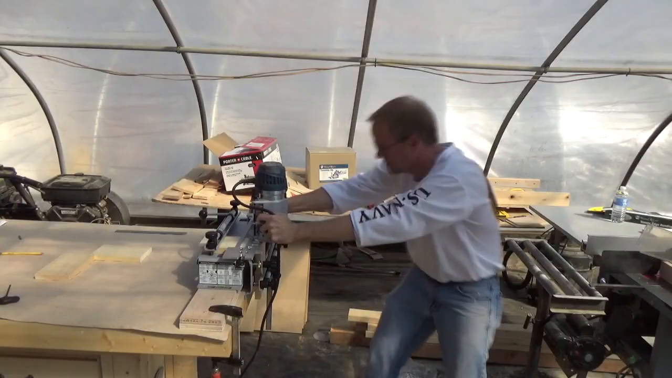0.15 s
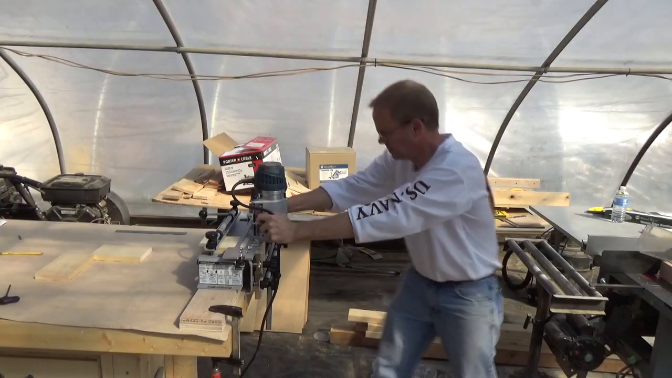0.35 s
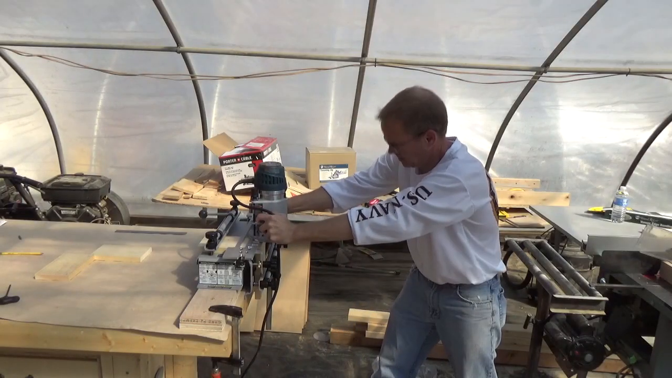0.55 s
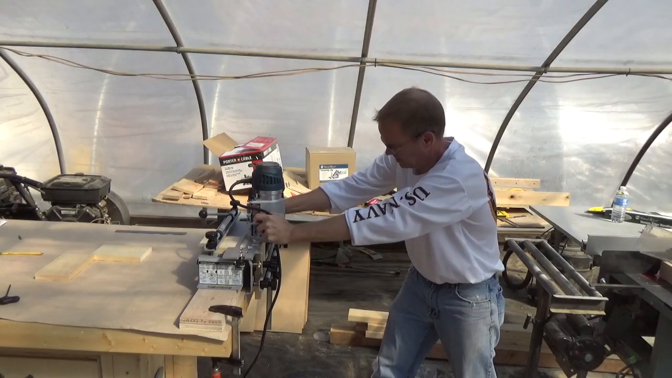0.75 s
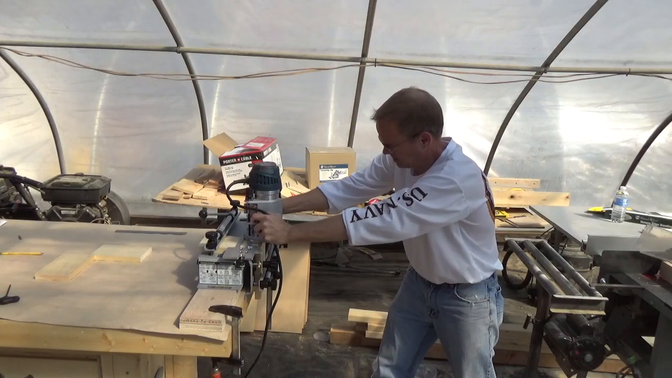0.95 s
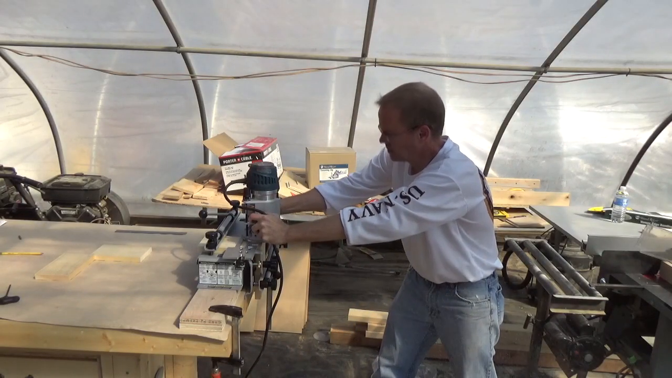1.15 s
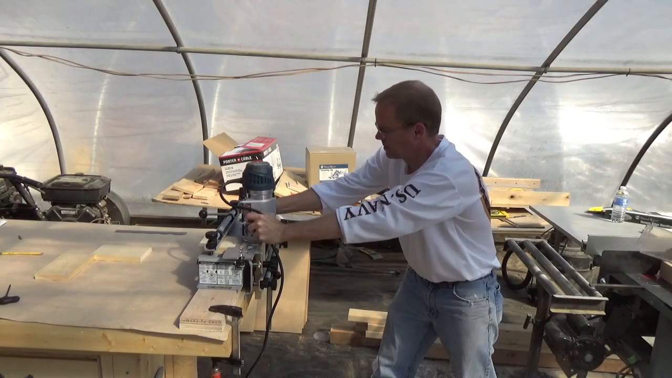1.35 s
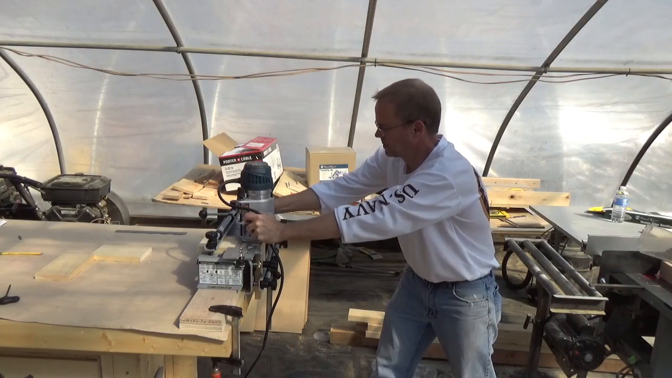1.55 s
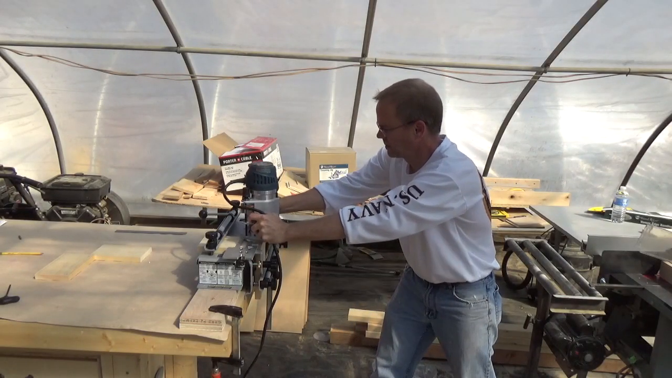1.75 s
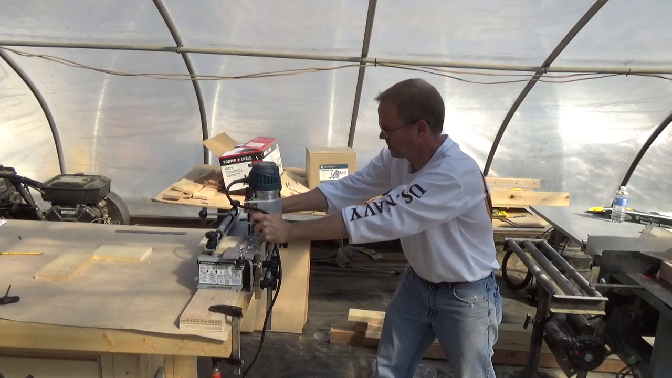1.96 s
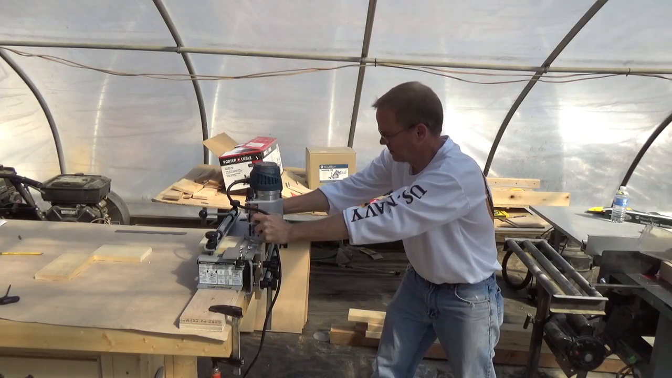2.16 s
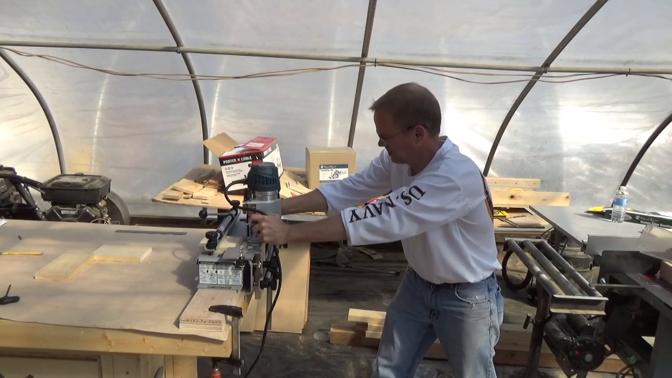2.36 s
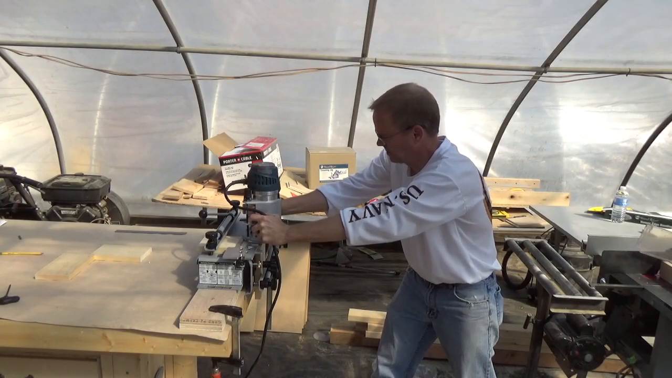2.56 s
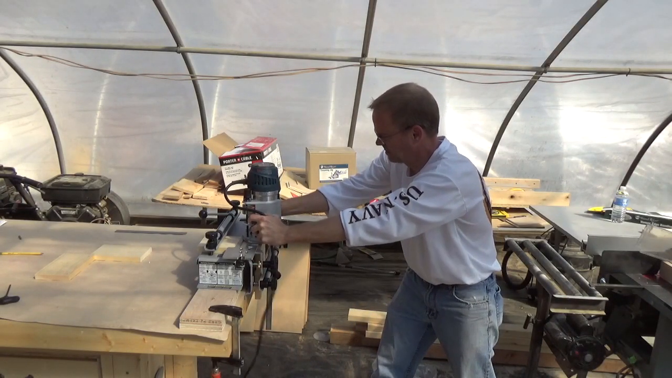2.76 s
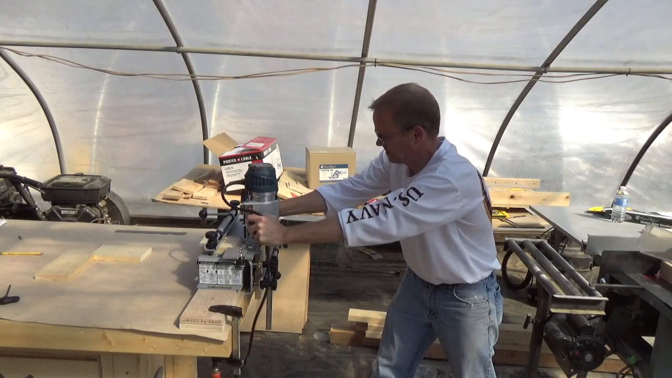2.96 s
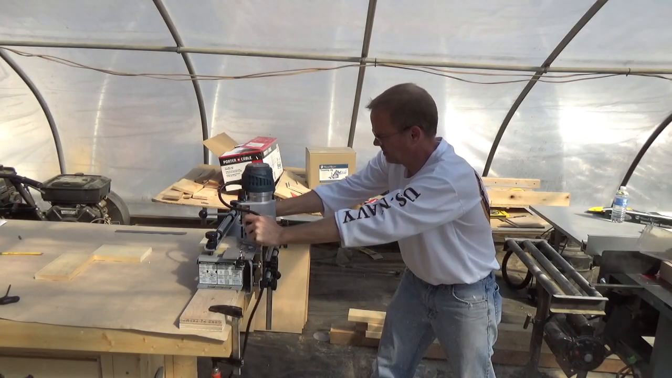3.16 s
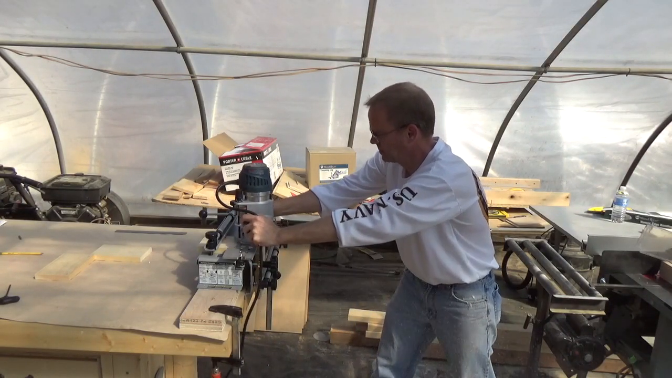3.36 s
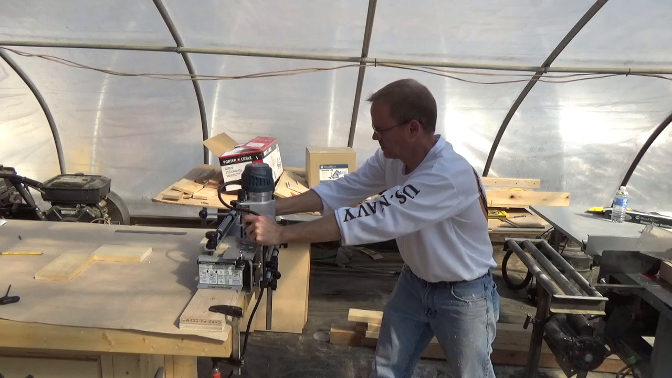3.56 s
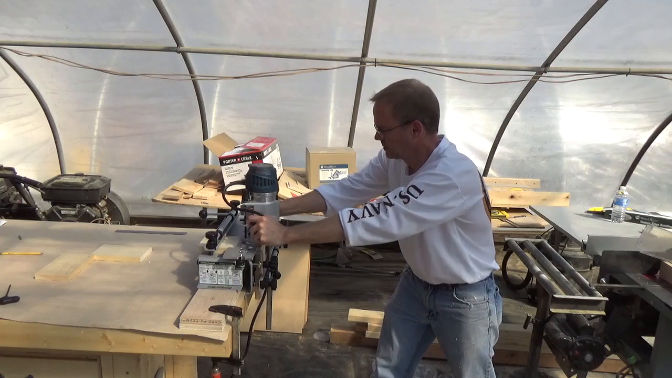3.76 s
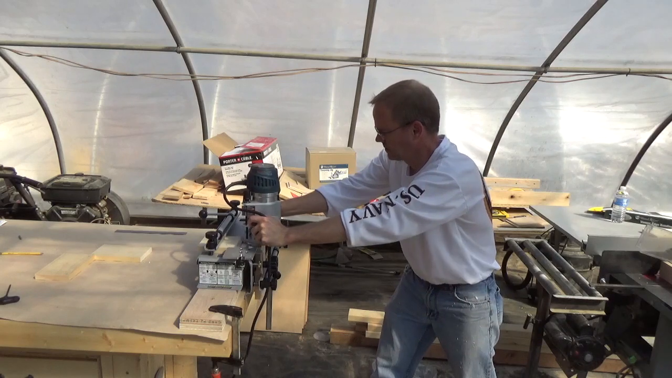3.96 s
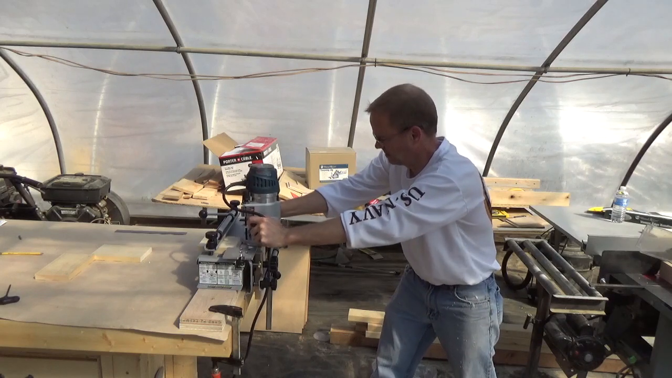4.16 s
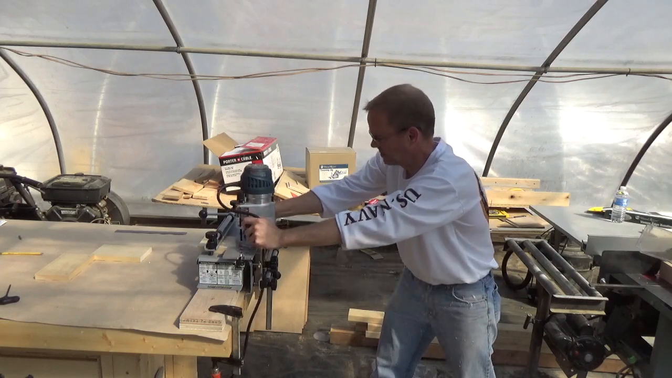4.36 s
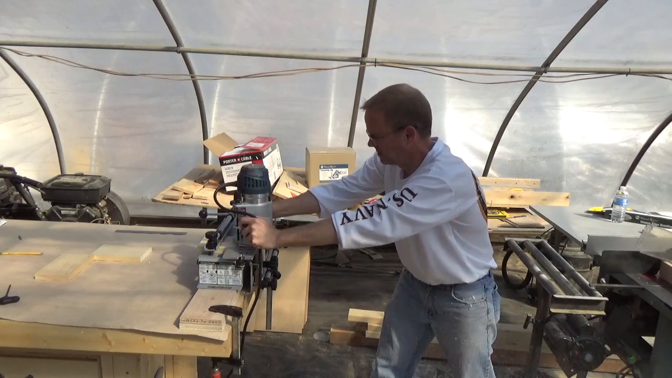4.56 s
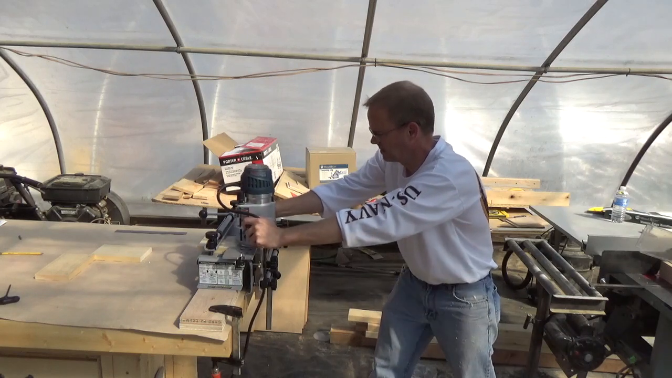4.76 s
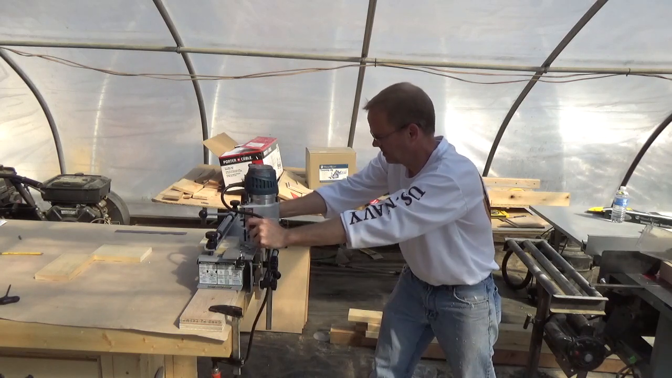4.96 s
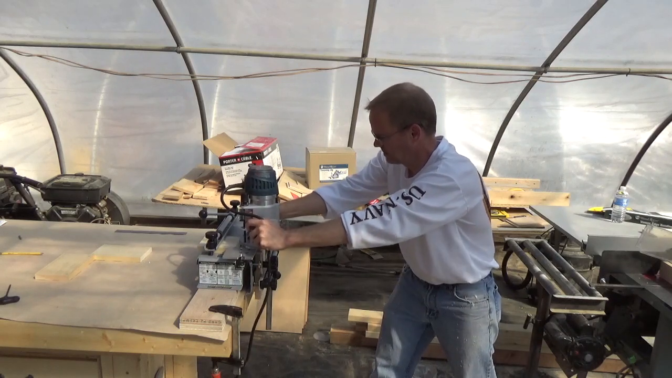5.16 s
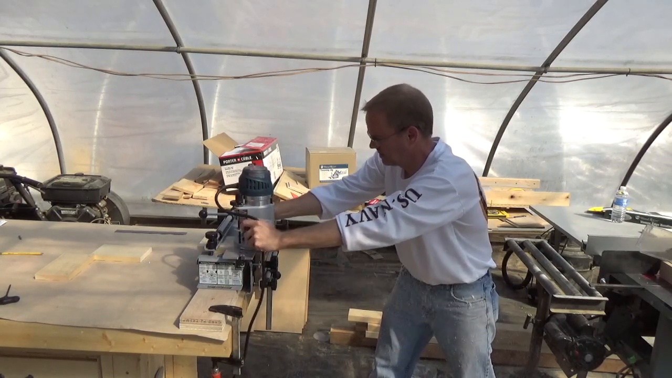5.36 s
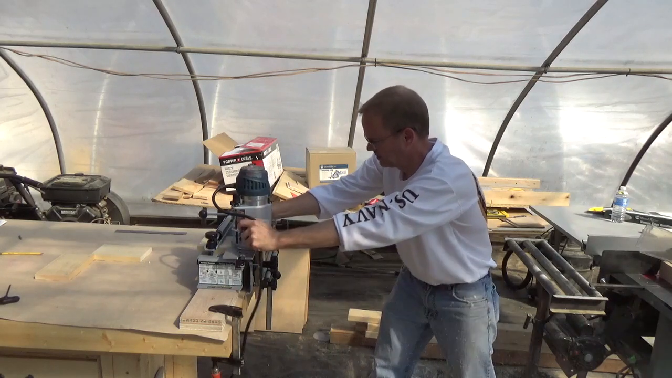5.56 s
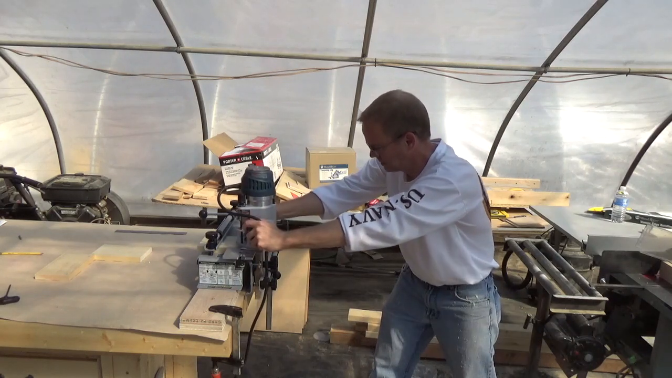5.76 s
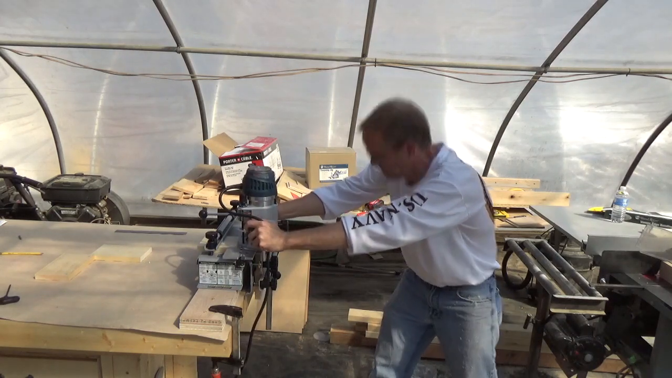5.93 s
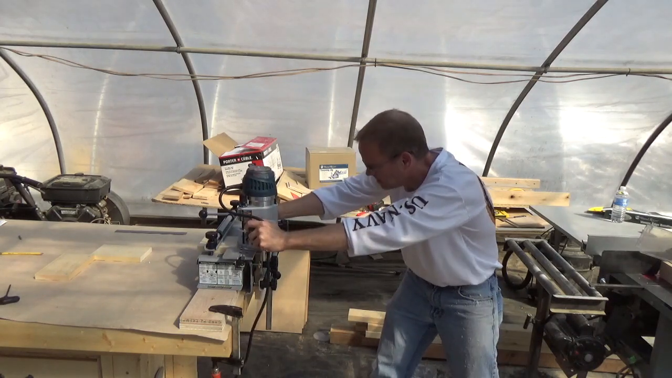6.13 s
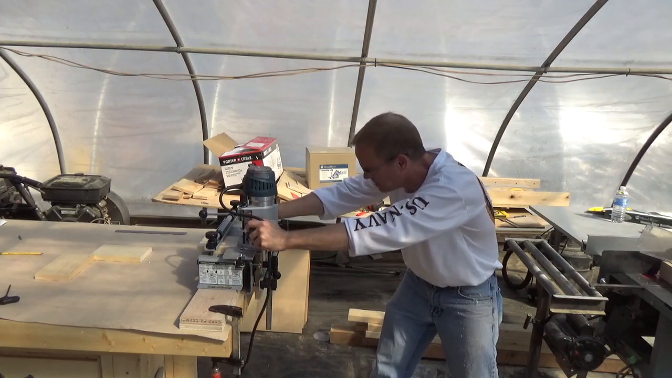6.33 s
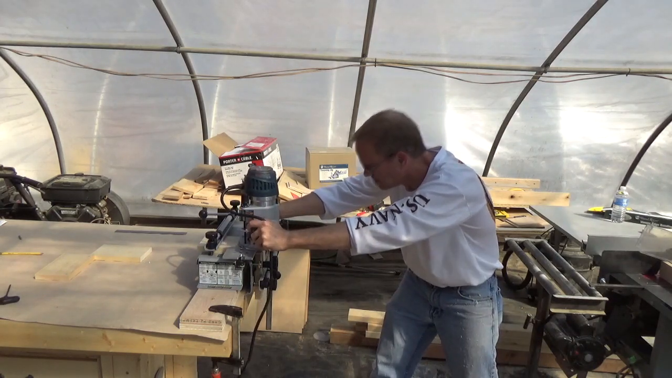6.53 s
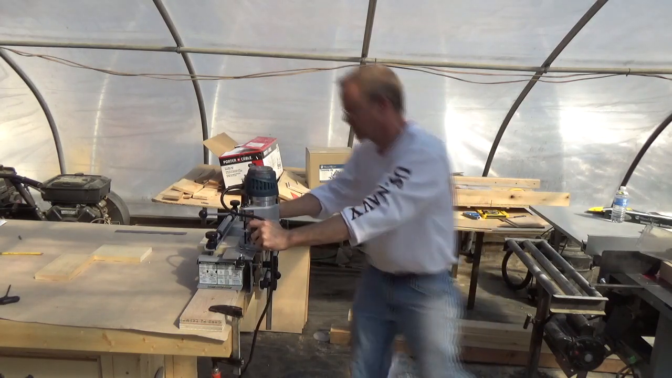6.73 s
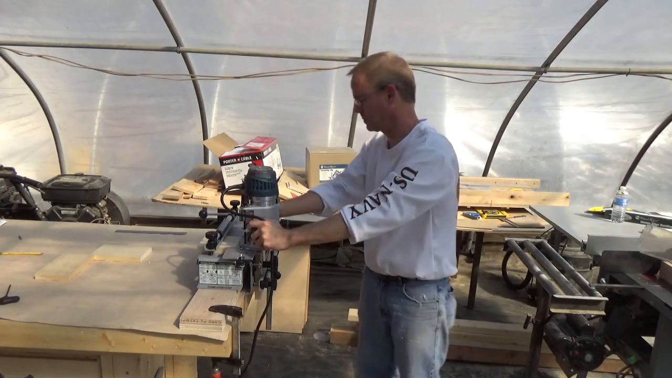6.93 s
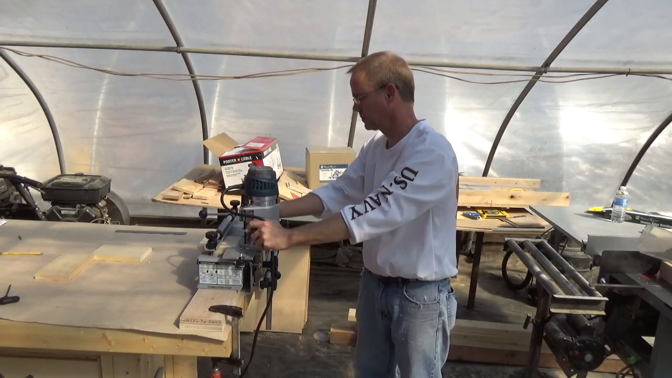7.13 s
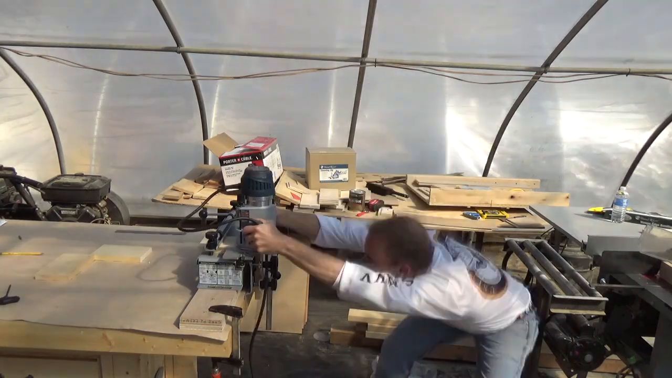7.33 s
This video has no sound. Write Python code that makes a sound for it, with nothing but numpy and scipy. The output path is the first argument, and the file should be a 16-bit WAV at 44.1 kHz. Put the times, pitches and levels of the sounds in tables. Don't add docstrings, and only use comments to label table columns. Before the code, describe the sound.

In a plastic-skinned workshop tunnel, cloth scuffs softly near the microphone before a handheld router surges up to a steady, piercing whine with rushing air. It makes one short cut, a pause, then three more cuts, each dragging the pitch down before it springs back. The power goes off and the motor coasts down, its hum swelling through resonances. A tiny mute interrupts the very end.

```python
import sys
import numpy as np
from scipy import signal
from scipy.io import wavfile
from scipy.ndimage import uniform_filter1d

SR = 44100
rng = np.random.default_rng(int(sys.argv[2]) if len(sys.argv) > 2 else 0)


def gain_from_db(level_db):
    decades = np.asarray(level_db, float) / 20
    return 10 ** decades


def put_to_file(sound):
    columns = np.atleast_2d(sound).T
    safe = np.clip(columns, -1, 1)
    whole_steps = np.round(safe * 32767)
    wavfile.write(sys.argv[1], SR, whole_steps.astype(np.int16))


N = 330309
COARSE = 40

# bit enters t/s, breaks out t/s, sag of the turn rate f/Hz, recovery t/s, whine lift level/dB
CUTS = [
    (0.936, 1.311, 17.2, .24, 2),
    (2.808, 3.371, 33.4, 0.39, 3.5),
    (4.173, 4.551, 37.5, .336, 3),
    (5.168, 5.538, 32.8, 0.32, 2),
]
# multiple, free level/dB, biting level/dB, flicker level/dB
LOW_TONES = [(1, -39.5, -46.5, -0.03), (2, -47.5, -46, .8), (3, -50.5, -40.5, 1), (4, -49.5, -42.5, 1.1),
             (5, -37.5, -34.5, .08), (6, -51, -36.5, 1.1), (7, -51, -49.5, 3.5)]
# t/s, half width t/s, multiple, level/dB
SHIFTS = [(0.9, 0.039, 1, 3.5), (6, 0.19, 1, 1), (1.2, 0.2, 2, -8.5), (3.58, 0.038, 2, -17),
          (3.92, 0.15, 2, 8.5), (4.9, 0.072, 2, 9), (2.15, 0.17, 3, 6.5), (3.0, 0.05, 3, 10.5),
          (3.72, 0.036, 3, 12), (4.29, .05, 3, 15), (4.89, 0.025, 3, 3), (5.28, 0.082, 3, 17),
          (2.06, 0.47, 4, 7.5), (3.83, 0.047, 4, 13.5), (5, 0.35, 4, -5.5), (1.304, 0.045, 5, -13),
          (1.31, .06, 7, -13), (4, .05, 4, -7), (4.5, 0.051, 6, 3), (1.6, .28, 5, -2), (2.44, 0.31, 5, 3),
          (5.19, 0.042, 5, -6.5), (3.19, 0.057, 6, 7.5), (1.72, 0.13, 6, 6.5), (1.17, 0.07, 7, 8),
          (2.32, 0.025, 7, 12), (3.19, 0.034, 7, 12.5), (4.03, 0.064, 7, 12.5), (5.98, .14, 7, 8)]
# f/Hz, width f/Hz, level/dB
STANDING_WAVES = [(115, 4.6, -62), (141, 8.3, -60), (163, 6, -63), (193.6, 7.1, -44.5), (230, 9.5, -54),
                  (265.4, 8.4, -46.5), (292, 12, -46), (317.5, 7.4, -58), (358.7, 10.6, -42),
                  (403, 24, -45.5), (440, 9.1, -33.5), (486, 24, -35.5), (636, 110, -37), (743, 35, -37)]
# t/s, half width t/s, dip of the router
# level/dB
NULLS = [
    (1.34, .014, -4),
    (1.818, .009, -2),
    (4.585, .018, -1),
    (5.57, .022, -1),
]
# multiple, level/dB
FREE_WHINE = [(8, -15), (9, -11), (10, -12), (11, -13), (12, -15), (13, -9), (14, -14), (15, -17),
              (16, -20), (17, -19), (18, -10), (19, -16), (20, -19), (21, -20), (22, -19), (23, -23),
              (24, -20), (25, -25), (26, -32)]
# multiple, level/dB
BITING_WHINE = [(8, -9), (9, -8), (10, -14), (11, -17), (12, -14), (13, -22), (14, -20), (15, -18),
                (16, -18), (17, -22), (18, -16), (19, -18), (20, -21), (21, -19), (22, -23), (23, -24),
                (24, -27), (25, -27), (26, -28)]
# t/s, half width t/s, multiple, level/dB
FLARES = [(0.94, 0.1, 10, 9.5), (.97, .06, 14, 8), (1.32, 0.038, 13, 2), (1.305, .06, 14, 14),
          (1.5, 0.19, 18, 4), (3.24, .09, 8, 7), (3.3, .08, 9, 4), (3.58, .07, 16, 7), (3.0, .08, 16, 7),
          (4.35, .07, 15, 6), (3.55, .06, 24, 7), (3.09, 0.075, 13, -8), (4.18, 0.032, 10, 13),
          (2.34, .06, 10, 9), (1.82, 0.02, 10, 8), (3.65, 0.053, 10, 3), (1.23, 0.044, 20, 15),
          (5.12, .12, 8, 7), (5.35, 0.072, 9, -1), (6.0, .12, 8, 5), (5.85, 0.12, 15, 13)]
# t/s, level/dB
SLOT_WHINE = [
    (0.39, -63),
    (0.43, -54),
    (0.438, -29.5),
    (0.465, -33.5),
    (0.49, -42),
    (0.505, -53),
    (0.56, -77.5),
]
# t/s, level/dB
SHELL_RING = [
    (6.0, -110),
    (6.1, -70),
    (6.17, -53),
    (6.35, -48),
    (6.48, -47),
    (6.54, -62),
    (6.6, -110),
]
# f/Hz, level/dB per Hz
RUSH_COLOUR = [(300, -13), (600, -14), (1000, -1), (1500, 4), (2300, -5), (2800, -5.5), (4500, -0.5),
               (7500, -0.5), (10500, -8.5), (11500, -14)]
# f/Hz, width f/Hz, level/dB
HOUSING = [(650.5, 57, -5.5), (738, 19.8, 2.5), (921, 47, -0.5), (1213, 53, -1), (1420, 780, -10.5),
           (2270, 570, -8), (3240, 800, -15), (4700, 350, -13), (5100, 220, -17.5), (8850, 870, -19.5)]
# multiple of the turn rate, lift level/dB, log spread
RUBBING = [
    (4.04, 6, 0.27),
    (22.2, 6.5, 0.24),
    (46, 5, 0.26),
]
# t/s, half width t/s, level/dB
SCUFFS = [
    (.092, 0.031, -58),
    (.163, .014, -70),
    (.262, 0.022, -64.5),
    (.36, 0.05, -55),
]
# f/Hz, level/dB per Hz
SCUFF_COLOUR = [(180, -36), (300, -11), (431, -7), (888, -2.5), (1100, -1), (1700, -1), (2100, -6.5),
                (11000, -11.5), (14300, -44), (22000, -120)]
# t/s, level/dB
RUMBLE = [
    (0, -71),
    (.4, -62),
    (.7, -75),
    (3, -74.5),
    (5.9, -75),
    (6.4, -67.5),
    (6.9, -60.5),
    (7.2, -61.5),
    (7.49, -60),
]
# f/Hz, level/dB per Hz
RUMBLE_COLOUR = [(25, -9), (60, 0), (120, -3), (250, -9), (450, -11), (700, -18)]
# f/Hz, left-right likeness 0-1
LIKENESS = [(60, 0.87), (170, 1), (480, 0.87), (1370, 0.8), (3880, 0.88), (11000, 0.98)]
# t/s, gain level/dB
MUTE = [
    (7.3975, 0),
    (7.4, -45),
    (7.435, -31),
    (7.462, -15),
    (7.473, -1),
    (7.49, 0),
]

FREE_HZ, BITING_HZ = 425, 393
POWER_OFF_S, COAST_DB = 6.18, -30
BARS, FAN_BLADES = 24, 18


def bump(x, width):
    return np.exp(-(x / width) ** 2 / 2)


def rotor(t):
    sag, bite, lift_db, ringing = 0, 0, 0, 0
    closing_from_s, coast_from_s = .379, 6.175
    regained_s = [closing_from_s + .45]
    for enter, leave, sag_hz, recovery, db in CUTS:
        deepening = np.clip((t - enter) / (leave - enter), 0, 1) ** 1.9
        recovering = np.clip(1 - (t - leave) / recovery, 0, 1) ** 2.17
        dip = deepening * recovering
        sag = sag + sag_hz * dip
        lift_db = lift_db + db * np.clip(8 * dip, 0, 1) * (1 - .5 * dip)
        buried = np.clip(sag_hz * dip / 22.5, 0, 1) ** 3.7
        bite = bite + buried * np.clip((leave + 0.065 - t) / 0.052, 0, 1)
        regained_s.append(leave + 0.79 * recovery)

    for s in regained_s:
        since = np.clip(t - s, 0, None)
        ringing = ringing + 3.5 * np.sin(2 * np.pi * since / .24) * np.exp(-since / 0.15)

    closing = FREE_HZ * (1 - np.exp(-(t - closing_from_s) / .111))
    ramp = np.clip(61 + 1150 * (np.minimum(t, .46) - .33), 61, None)

    drag_hz, drag_per_s, brake_hz = 335.2, .4774, 14
    since = np.clip(t - coast_from_s, 0, None)
    coasting = drag_hz * np.tan(np.arctan((FREE_HZ - brake_hz) / drag_hz) - drag_per_s * since)
    coasting = coasting + brake_hz * np.exp(-since / .06)
    turns = np.maximum(closing, ramp) - sag + ringing + coasting - FREE_HZ
    inertia_s = .03
    return uniform_filter1d(turns, int(inertia_s * SR)), sag, bite, lift_db


def grip_db(shifts, t, multiple):
    return sum(db * bump(t - s, width) for s, width, which, db in shifts if round(which) == multiple)


def standing(hz):
    peaks = sum(gain_from_db(db) * bump(hz - centre, 0.82 * width) for centre, width, db in STANDING_WAVES)
    return peaks + gain_from_db(-65)


def tone_heights(t, turns, sag, bite, powered):
    t, turns, sag, bite, powered = (v[::COARSE] for v in (t, turns, sag, bite, powered))
    out = []
    for k, free_db, biting_db, flicker_db in LOW_TONES:
        load = sag / (FREE_HZ - BITING_HZ) if k == 1 else bite
        rise_db = 56 if k == 1 else 150
        db = free_db + load * (biting_db - free_db) + rise_db * np.log10((turns + sag) / FREE_HZ)
        db = db + grip_db(SHIFTS, t, k)
        if k == 5:
            db = db - 13 * bump(k * turns - 2009, 8) * (bite > .2)
            db = db - 8 * sum(bump(t - cut[1] - 0.11, 0.031) for cut in CUTS[1:])
        steady = gain_from_db(-2 * np.abs(flicker_db))
        reflected = (coarse_drift(7.6) + 1j * coarse_drift(8)) / np.sqrt(2)
        height = gain_from_db(db) * np.abs(steady + np.sqrt(1 - steady ** 2) * reflected)
        if k < 3:
            coast_gain = gain_from_db((k - 1) * -12)
            height = powered * height + (1 - powered) * coast_gain * standing(k * turns)
        out.append(filled(height))
    return out


def low_tones(turn, heights, powered):
    t, out = np.arange(N) / SR, 0
    flip = np.prod([np.tanh((t - s) / width) for s, width, db in NULLS[1:]], axis=0)
    for k, height in enumerate(heights, 1):
        lead = 0.24 * (1 + 0.13 * drift(1.4))
        tone = np.sin(k * turn + rng.uniform(0, 6.9) + lead * [[1], [-1]])
        fade_db = (k > 2) * (1 - powered) * COAST_DB
        level = gain_from_db(fade_db + 4.0 + 1.0 * drift(7.2))
        out = out + height * level * tone * (flip if k == 1 else 1)
    return out


def whine(turn, turns, whine_db, powered, load):
    whine_db = whine_db + (1 - powered) * COAST_DB + 60 * np.log10(turns / FREE_HZ)
    t = np.arange(N) / SR
    out, coarse_t, load = 0, t[::COARSE], load[::COARSE]
    for (k, free_db), (_, biting_db) in zip(FREE_WHINE, BITING_WHINE):
        if k == FAN_BLADES:
            flicker_db = 1 - 8 * load + 3.5 * coarse_drift(14)
        else:
            flicker_db = 2.4 * coarse_drift(6) + 3.4 * coarse_drift(16)
        db = free_db + load * (biting_db - free_db) + flicker_db + grip_db(FLARES, coarse_t, k)
        wobble = .01 * k * drift(25)
        out = out + filled(gain_from_db(db)) * np.sin(k * turn + rng.uniform(0, 5.3) + wobble)
    slots = blurred(BARS / 2 * turn, in_time(SLOT_WHINE)[0] - 3)
    shell_hz = 7628
    shell = gain_from_db(in_time(SHELL_RING)[0]) * np.sin(2 * np.pi * shell_hz * t + 1.2 * drift(10))
    return tunnel(gain_from_db(whine_db) * out + slots + shell, wet_db=-12, side_db=-2)


def tunnel(x, wet_db, side_db):
    t, t60_s = np.arange(SR // 2) / SR, 0.14
    mid, side = rng.standard_normal((2, len(t))) * gain_from_db(-60 * t / t60_s) * (t > .004)
    tail = gain_from_db(wet_db) * (mid + gain_from_db(side_db) * side * [[1], [-1]]) / np.sqrt(np.sum(mid ** 2))
    return x + signal.fftconvolve(x[None], tail, axes=1)[:, :N]


def air_rush(turn, rush_db, spun_up):
    chop = 1 + .1 * np.sin(turn)
    air = banded_noise(RUSH_COLOUR, patchy_db=1.7, top_hz=11060, count=11)
    return spun_up * gain_from_db(rush_db - 2.5) * chop * air


def housing_roar(turns):
    out, white = 0, rng.standard_normal((2, N))
    for k, (hz, width, level_db) in enumerate(HOUSING):
        r = np.exp(-np.pi * width / SR)
        feed = [(1 - r * r) / 2, 0, (r * r - 1) / 2]
        ring = [1, -2 * r * np.cos(2 * np.pi * hz / SR), r * r]
        mid, side = signal.lfilter(feed, ring, white)
        for multiple, lift_db, spread in RUBBING:
            distance = np.log(multiple * turns[::COARSE] / hz) / spread
            level_db = level_db + lift_db * np.exp(-distance ** 2)
        height = filled(gain_from_db(level_db + 1.4 * coarse_drift(20)))
        out = out + (-1) ** k * height * alike_pair(mid, side, hz)
    return rms_one(out)


def blurred(phase, level_db):
    return gain_from_db(level_db) * (drift(170) * np.sin(phase) + drift(170) * np.cos(phase))


def clothes_scuffs(t):
    rubbing = gain_from_db(-71) + sum(gain_from_db(db) * np.exp(-((t - s) / width) ** 4) for s, width, db in SCUFFS)
    return rubbing * banded_noise(SCUFF_COLOUR, patchy_db=1.5, top_hz=11700, count=9)


def far_rumble(rumble_db):
    return gain_from_db(rumble_db) * banded_noise(RUMBLE_COLOUR, patchy_db=-1.5, top_hz=680, count=10)


def banded_noise(spectrum, patchy_db, top_hz, count):
    out, edges = 0, top_hz * 2. ** (-np.arange(count, -1, -1) / 2)
    white = rng.standard_normal((2, 2, N))
    for k, (low, high) in enumerate(zip(edges, edges[1:])):
        band = signal.butter(2, [low, high], "band", fs=SR, output="sos")
        mid, side = signal.sosfilt(band, white[k % 2])
        hz = np.sqrt(low * high)
        height = filled(gain_from_db(at_hz(spectrum, hz) + patchy_db * coarse_drift(12)))
        out = out + height * alike_pair(mid, side, hz)
    return rms_one(out)


def alike_pair(mid, side, hz):
    alike = np.clip(at_hz(LIKENESS, hz), -1, 1)
    return np.sqrt(1 + alike) * mid + np.sqrt(1 - alike) * side * [[1], [-1]]


def at_hz(points, hz):
    points = np.array(points)
    return np.interp(np.log(hz), np.log(points[:, 0]), points[:, 1])


def in_time(rows):
    s, *columns = np.transpose(rows)
    return [np.interp(np.arange(N) / SR, s, c) for c in columns]


def rms_one(x):
    return x / np.sqrt(np.mean(x ** 2) + 1e-20)


def coarse_drift(rate):
    r = np.exp(-2 * COARSE * np.pi * rate / SR)
    white = rng.standard_normal((N - 1) // COARSE + 2001)
    return rms_one(signal.lfilter([1], [1, -2 * r, r * r], white)[2000:])


def filled(coarse):
    return np.interp(np.arange(N) / COARSE, np.arange(len(coarse)), coarse)


def drift(rate):
    return filled(coarse_drift(rate))


def scene():
    t = np.arange(N) / SR
    turns, sag, bite, lift_db = rotor(t)
    turn = 2 * np.pi * np.cumsum(turns + 0.71 * drift(8.2)) / SR
    on = np.clip((t - .28) / .06, 0, 1)
    spun_up = np.clip((t - .3) / 0.2, .03, 1) ** 1.27
    powered = np.clip((POWER_OFF_S + 0.049 - t) / 0.082, 0, 1)

    rumble_db, = in_time(RUMBLE)
    swing_db = rumble_db + 75
    speed = np.log10(turns / FREE_HZ)
    load = sag / (FREE_HZ - BITING_HZ)
    rush_db = -37.5 + 36 * speed + 0.67 * swing_db + 1.5 * load
    roar_db = -43.5 + 27.5 * speed + 1.04 * swing_db - 0.5 * load
    starting_db = 2.5 * bump(t - 0.61, 0.16)

    tones = low_tones(turn, tone_heights(t, turns, sag, bite, powered), powered)
    rush = air_rush(turn, rush_db, spun_up)
    roar = spun_up * gain_from_db(roar_db + 1.5 + starting_db) * housing_roar(turns)
    brushes = blurred(BARS * turn, rush_db - 23 - 22 * speed * (1 - powered))

    dip_db = sum(db * bump(t - s, width) for s, width, db in NULLS)
    let_go = sum(bump(t - cut[1] - 0.055, 0.031) for cut in CUTS)
    whine_db = -38.5 + 3.0 + lift_db - 4 * let_go + dip_db
    whine_db = whine_db + 60 * np.log10((turns + sag) / FREE_HZ) + drift(2.6)
    body = gain_from_db(dip_db) * (tones + rush + roar + brushes)
    router = on * (body + whine(turn, turns, whine_db, powered, bite))

    scuffs = (1 - on) * clothes_scuffs(t)
    left_db = 0.73
    return (router + scuffs) * gain_from_db([[left_db / 2], [-left_db / 2]]) + far_rumble(rumble_db)


def top_cut(x):
    return signal.sosfilt(signal.butter(12, 11590, fs=SR, output="sos"), x)


def record(dry):
    low_pass = signal.ellip(12, .5, 70, 11030, fs=SR, output="sos")
    dull = signal.sosfilt(low_pass, dry)
    return top_cut(dull * gain_from_db(in_time(MUTE)[0]))


dry = scene()
out = record(dry)
put_to_file(out)
```